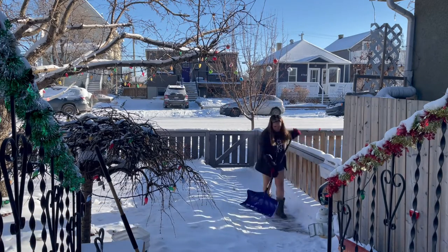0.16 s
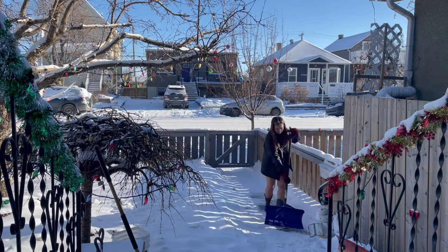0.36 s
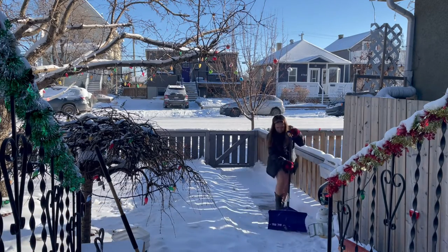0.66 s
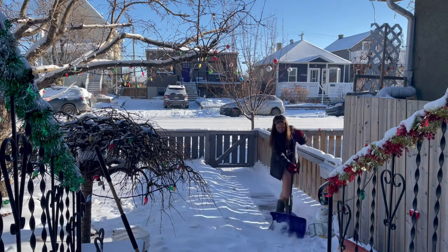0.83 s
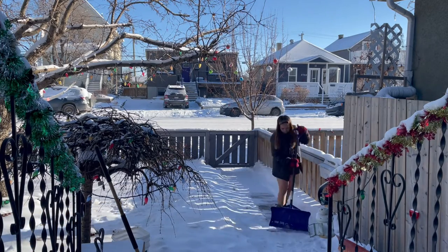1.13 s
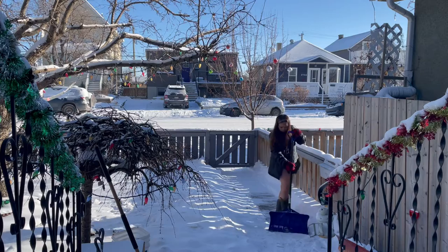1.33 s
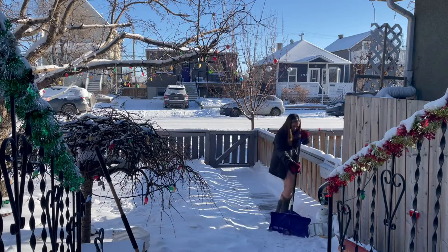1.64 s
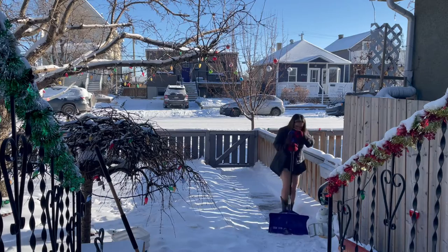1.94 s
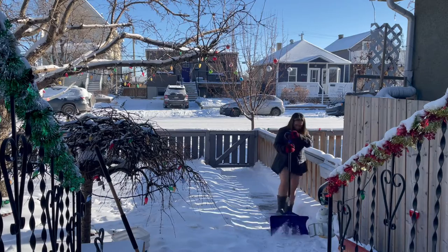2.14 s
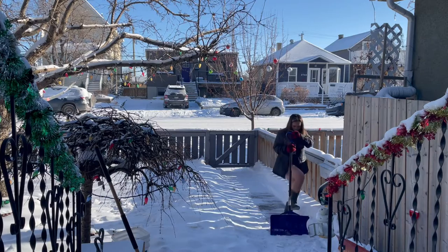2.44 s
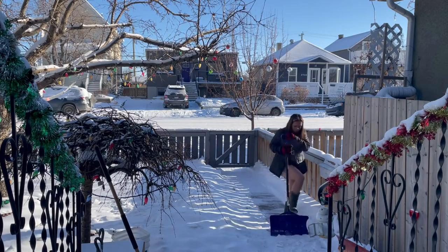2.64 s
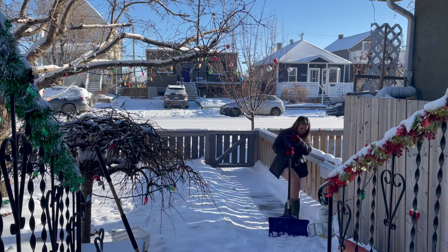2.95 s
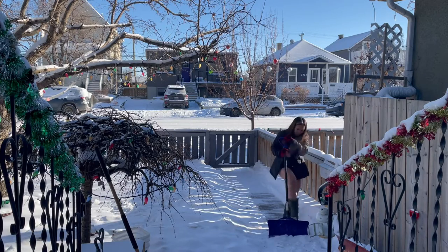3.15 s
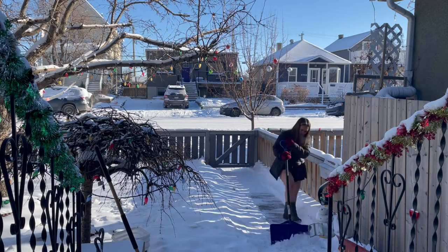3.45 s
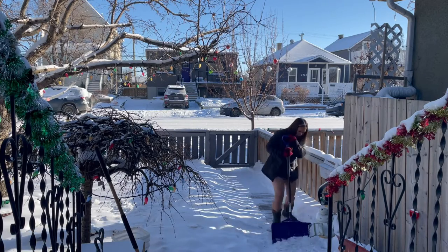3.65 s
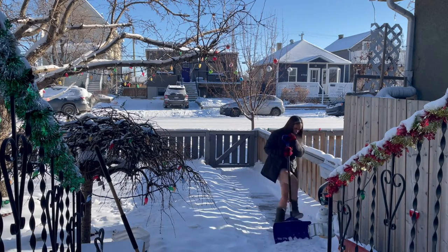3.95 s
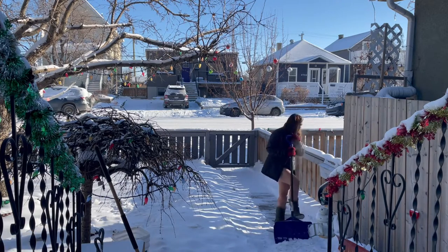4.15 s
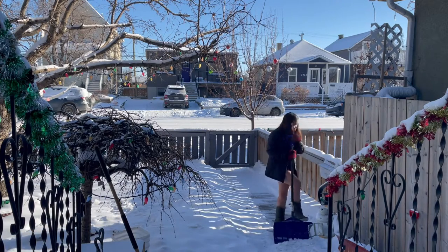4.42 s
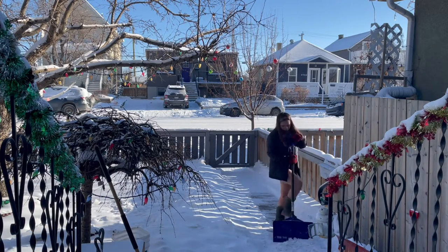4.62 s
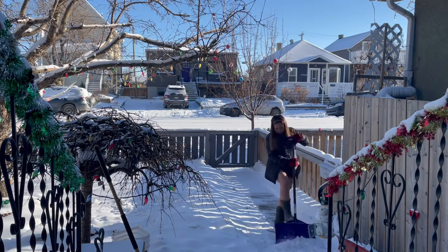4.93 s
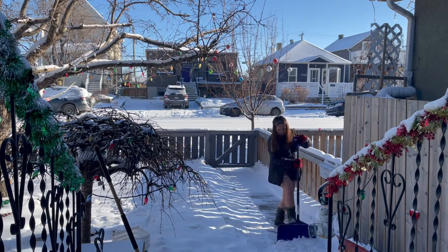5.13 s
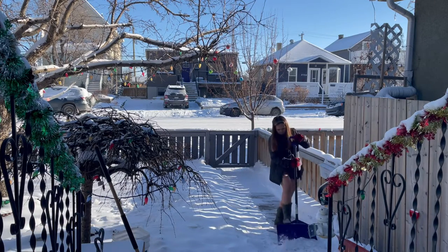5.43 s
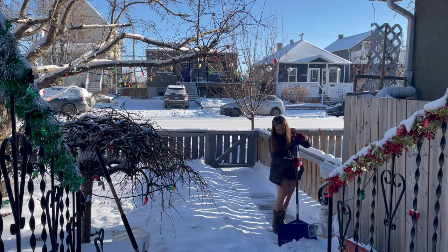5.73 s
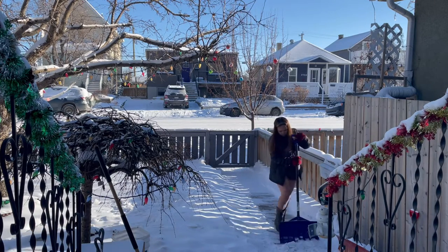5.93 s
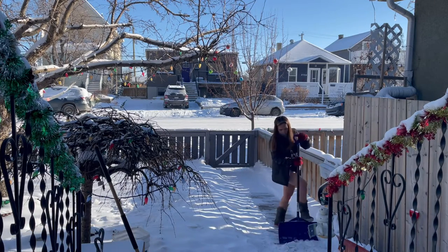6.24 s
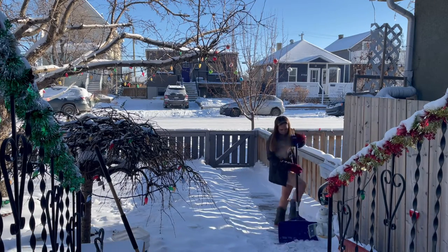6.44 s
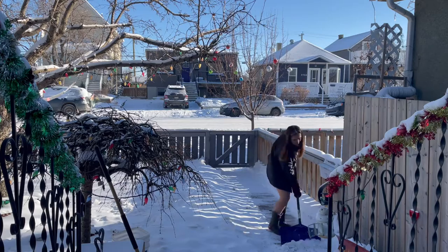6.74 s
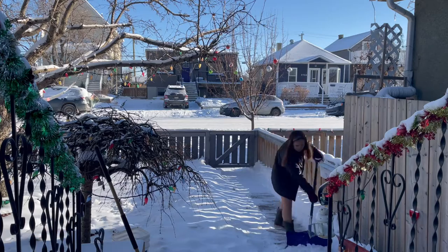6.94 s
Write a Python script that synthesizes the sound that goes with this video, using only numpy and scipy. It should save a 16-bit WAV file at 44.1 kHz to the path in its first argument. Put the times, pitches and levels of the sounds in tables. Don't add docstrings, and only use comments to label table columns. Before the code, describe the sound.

A phone on a porch hears a plastic shovel in crusty snow on a wooden deck, a few metres away outdoors. For the first 0.4 seconds there is only low distant traffic and a faint scrape. A crunch with a hollow knock comes at 0.46, a much harder one at 0.84, light scuffs near 1.2, then another strong chop at 1.53. Blows follow at 2.1, then crowd together from 2.5 to 3.45, with heavy gritty crunches and dull board thuds. A weaker stroke at 3.78 leads to a hard, deep one at 4.06. Small scrapes and a tiny squeak at 4.48 fill a lull. Chops resume at 4.89, 5.16, 5.4 and a knocky tap at 5.6. From 5.85 lighter bumps and pushes continue, a longer shove arrives at 6.76 and slides away by 7.1, while road noise grows slightly. Reflections are short and scattered.

```python
import sys
import numpy as np
from scipy import signal
from scipy.fft import rfft, irfft
from scipy.io import wavfile
from scipy.ndimage import uniform_filter1d

SR = 44100
rng = np.random.default_rng(int(sys.argv[2]) if len(sys.argv) > 2 else 0)


def put_to_file(sound):
    columns = np.atleast_2d(sound).T
    safe = np.clip(columns, -1, 1)
    whole_steps = np.round(safe * 32767)
    wavfile.write(sys.argv[1], SR, whole_steps.astype(np.int16))


def volts(x):
    e = np.asarray(x, float) / 20
    return 10 ** e


N = 312228
TOP_HZ = 15900

# freq_hz, level_db_per_hz
CRUST_SPECTRUM = [(290, 6), (500, -0.5), (888, -3), (1140, -2.5), (1430, -4.5), (2030, -2), (3160, -7.5),
                  (3900, -7.5), (7000, -23), (9100, -51), (15400, -120)]
# freq_hz, level_db_per_hz
POWDER_SPECTRUM = [(4500, -13), (6000, -9.5), (8300, -3.5), (11500, -11.5), (13500, -13.5), (15700, -17.5)]


def unit(x):
    return x / np.sqrt(np.mean(x ** 2))


def along(table, log=True):
    hz, value = np.transpose(table)
    bins = np.arange(N // 2 + 1) * SR / N + 1
    if log:
        return np.interp(np.log(bins), np.log(hz), value)
    return np.interp(bins, hz, value)


def over_time(curve):
    return np.interp(np.arange(N) / SR, *np.transpose(curve))


def colour(x, table):
    return irfft(rfft(x) * volts(along(table)), N)


def ring(x, modes, order=1):
    hz = np.arange(N // 2 + 1) * SR / N + 1
    gain = 0
    for k, (mode_hz, width_hz, db) in enumerate(modes):
        detune = (hz ** 2 - mode_hz ** 2) / (hz * width_hz)
        gain = gain + (-1) ** k * volts(db) / (1 + 1j * detune) ** order
    return unit(irfft(rfft(x) * gain, N))


def steady(x, hold_s):
    k = max(int(hold_s * SR), 8)
    power = uniform_filter1d(uniform_filter1d(x ** 2, k), k)
    return x / np.sqrt(power + 0.022)


def tones(x, modes, hold_s):
    return unit(sum(volts(db) * steady(ring(x, [(hz, width, 0)], order=2), hold_s) for hz, width, db in modes))


def walk(rate_hz):
    k = int(SR / rate_hz)
    held = np.repeat(rng.standard_normal(N // k + 1), k)
    return uniform_filter1d(uniform_filter1d(held, k), k)[:N]


def swells(events, extra_db, crest_db=3):
    power = np.zeros((len(extra_db), N))
    for (s, db, rise_ms, fall_ms), more_db in zip(events, np.transpose(extra_db)):
        a = max(int((s - rise_ms / 400) * SR), 0)
        b = min(int((s + fall_ms / 400) * SR), N)
        ms = 1000 * (np.arange(a, b) / SR - s)
        below_db = 20 * np.where(ms < 0, -ms / max(rise_ms, 1), ms / max(fall_ms, 1))
        rounded_db = np.hypot(below_db, np.where(ms < 0, 0.6, 1) * crest_db)
        power[:, a:b] += (volts(more_db)[:, None] * volts(db - rounded_db)) ** 2
    return np.sqrt(power)


def marked(s, times):
    nearest = np.argmin(np.abs(s[:, None] - np.array(times)), axis=0)
    return np.isin(np.arange(len(s)), nearest)


def traffic():
    # freq_hz, level_db_per_hz
    spectrum = [(30, -10), (135, 1), (230, -3), (500, -9.5), (900, -13), (1500, -21), (3000, -31),
                (6000, -71)]
    # time_s, level_db
    hum = [
        (.4, -49),
        (0.702, -52),
    ]
    # time_s, level_db
    road = [(.3, -57.5), (.62, -63.5), (2.3, -62.5), (2.94, -57), (4.2, -63.5), (5.35, -60), (6.6, -51.5),
            (7.08, -51)]
    mid, side = (colour(rng.standard_normal(N), spectrum) for _ in range(2))
    side = colour(side, [(50, -14.5), (250, -3.0), (800, 2.0), (8000, 1.0)])
    both = np.array([mid + side, mid - side])
    bass = signal.sosfilt(signal.butter(2, 300, fs=SR, output="sos"), both)
    bass_db = over_time(hum) + 0.91 * walk(6.8)
    road_db = over_time(road) + 7.0 + 1.83 * walk(3.774)
    return volts(bass_db) * unit(bass) + volts(road_db) * unit(both - bass)


def thuds():
    # peak_s, level_db, rise_ms_per_20db, fall_ms_per_20db, upper_over_lower_db
    knocks = [(.465, -25.5, 8, 18, -2), (.506, -28, 14, 58, 13), (0.834, -10.5, 18, 25, 16.5),
              (1.212, -25, 1, 14.5, 5), (1.23, -27.5, 6.5, 35.5, 9), (1.545, -17.5, 39, 9.5, 20),
              (1.588, -26.5, 12.5, 52, 19), (2.121, -28, 34, 31, 0), (2.519, -16.5, 33, 25.5, 1.5),
              (2.582, -22, 10.5, 37.5, 21), (2.715, -14, 12.5, 42, 10), (2.88, -18, 14, 27.5, 16.5),
              (3.007, -17, 47, 20, 6.5), (3.211, -21.5, 1, 34.5, 11.5), (3.351, -23, 41, 49, 5),
              (3.386, -21.5, 21, 23, 11.5), (3.402, -21.5, -5.5, 59.5, 1.5), (3.431, -17.5, 4, 12, 6),
              (3.782, -22.5, -1, 20, 11), (4.062, -19.5, 23, 26, 12), (4.89, -22, 22, 27, 5),
              (5.161, -27, 13, 23, 7), (5.403, -26.5, 17, 41, -3), (5.601, -19, -0.5, 23, -7.2)]
    # peak_s, level_db, fall_ms_per_20db, upper_over_lower_db
    bumps = [(0.033, -52.5, 18.5, -11), (.09, -48, 36, -6), (.752, -49.5, 31, 10), (1.425, -42.5, 17, 8),
             (2.81, -48, 39, 6), (5.215, -51, 40, -4), (5.261, -41, 23, 4), (5.302, -45, 20, 0),
             (5.76, -49.5, 20, 8), (5.8, -45.5, 28, 9), (5.93, -48, 25, 0), (6.098, -48.5, 44, -3),
             (0.684, -37, 102, 19), (.899, -36.5, 37.5, 20), (1.017, -43, 67, 18), (2.342, -36.5, 90, 15),
             (3.178, -38, 22, 14), (4.126, -40, 37, 11.5), (4.248, -44.5, 121, 6.5), (4.378, -35, 41, -5),
             (5.063, -32.5, 12, 7.5), (5.501, -50, 116, 7), (5.684, -39, 23, -3), (5.844, -32, 28, 7),
             (5.867, -30, 40, 15), (6.026, -37, 32, 18), (6.229, -30, 23.5, -4)]
    # peak_s, level_db, ms_per_20db, upper_over_lower_db
    leans = [(1.41, -48, 140, -5), (1.844, -40.5, 54, 8.5), (2.212, -38.5, 53, 20), (2.285, -36.5, 31, 11),
             (3.114, -42.5, 42, 2), (4.609, -40.5, 45, 1.5), (5.015, -44.5, 53, 7), (6.44, -38.5, 42, 8),
             (6.634, -33.5, 49, 9), (6.757, -30, 48, 18)]
    # time_s, level_db
    raps = [
        (0.825, -22.5),
        (1.839, -29),
        (6.228, -31),
    ]
    knock_rattle_db, bump_rise_ms = -6, 13
    rows = [(s, db + knock_rattle_db, *rest) for s, db, *rest in knocks]
    rows += [(s, db, bump_rise_ms, fall, upper) for s, db, fall, upper in bumps]
    rows += [(s, db, ms, ms, upper) for s, db, ms, upper in leans]
    rows += [(s, db, 5, 16, 4) for s, db in raps]
    return np.array(rows, float)


def deck():
    # freq_hz, width_hz, level_db
    low_boards = [(142.2, 26.7, -5.5), (189.6, 70, 1)]
    # freq_hz, width_hz, level_db
    high_boards = [(226.7, 78, 0.5), (327.4, 21.6, 3), (442.2, 14.6, -8)]
    # freq_hz, width_hz, level_db
    scoop_modes = [(658, 21, 7), (920, 600, -8)]
    scoop_hits_s = [1.017, 2.122, 2.212, 2.712, 3.211, 3.351, 3.385, 3.405, 4.381, 5.161, 6.028, 6.231,
                    6.441, 6.755]
    hit_db, idle_db = -2.5, -32.5
    rows = thuds()
    scoop_db = np.where(marked(rows[:, 0], scoop_hits_s), hit_db, idle_db)
    high_db = -10 * np.log10(1 + volts(-2 * rows[:, 4]))
    low_db = high_db - rows[:, 4]
    low, high, knock = swells(rows[:, :4], [low_db, high_db, scoop_db], crest_db=1.5)
    shove = rng.standard_normal(N)
    deep = tones(shove, low_boards, 0.042)
    hollow = tones(shove, high_boards, 0.005)
    scoop = steady(ring(shove, scoop_modes, order=2), 0.0029)
    return volts(6.0) * low * deep + high * hollow + volts(-11.0) * knock * scoop


def jolts():
    # peak_s, level_db, pitch_hz, width_ms_between_20db_down_points
    deep_jolts = [(0.8438, -22, 172, 53), (1.505, -21.5, 163, 11), (1.5266, -19.5, 162, 14),
                  (2.5185, -18, 165, 21.5), (2.582, -23.5, 190, 27), (2.7217, -19, 166, 19),
                  (2.7428, -24, 165, 9), (2.8804, -29.5, 187, 27), (2.983, -22, 147, 17),
                  (3.0065, -16.5, 164, 16.5), (3.211, -20.5, 194, 24), (3.3491, -33, 186, 29),
                  (3.3871, -29, 170, 19), (3.4112, -25, 178, 26), (3.4434, -29.5, 162, 20),
                  (4.0616, -12, 155.5, 20), (4.882, -29.5, 176, 26), (4.9098, -31, 147, 20),
                  (5.171, -23.5, 158, 30), (5.4028, -21.5, 166, 29), (5.6011, -24, 176, 14),
                  (6.2332, -21, 163, 18)]
    # peak_s, level_db, pitch_hz, width_ms_between_20db_down_points
    hollow_jolts = [(0.4642, -20.5, 327, 10), (0.5067, -23.5, 334, 10), (0.8315, -17, 330, 14),
                    (0.8477, -18.5, 363, 19), (0.8657, -24.5, 351, 24), (1.5065, -22, 290, 12),
                    (1.5398, -14.5, 344, 31), (2.1199, -19, 351, 31), (2.13, -29.5, 347, 8.3),
                    (2.5068, -31.5, 288, 19), (2.5202, -20, 333, 18), (2.5366, -22, 386, 9),
                    (2.5812, -27.5, 268, 18), (2.592, -27.5, 306, 14), (2.5978, -24, 306, 27),
                    (2.7032, -23.5, 320, 20), (2.7125, -22, 340, 6), (2.726, -11, 365, 8),
                    (2.7376, -26.5, 360, 31), (2.8773, -21.5, 320, 24), (2.8849, -21.5, 322, 25),
                    (2.9914, -15, 283, 13), (3.0015, -20, 323, 29), (3.0159, -11.5, 260, 15),
                    (3.025, -26.5, 276, 32), (3.2111, -12, 306, 9.3), (3.2196, -12, 340, 10.4),
                    (3.227, -22, 388, 16), (3.2416, -21, 316, 15), (3.3482, -27, 306, 17),
                    (3.412, -12.5, 342, 10), (3.4372, -24, 293, 30), (3.4471, -20, 352, 8.2),
                    (4.0583, -24.5, 309, 12), (4.0735, -31, 327, 46), (4.8871, -17, 303, 14),
                    (4.8955, -24, 289, 12), (4.9067, -24, 300, 28), (5.15, -26, 278, 19),
                    (5.1606, -32, 287.7, 32), (5.1709, -29.5, 287, 22), (5.416, -27, 310, 22),
                    (5.6104, -18.5, 266, 20), (5.8686, -25, 297, 13.4), (6.2335, -28.5, 298, 14)]
    rise, fall, jolt_db = 0.8, 0.95, -3
    rows = np.array([*deep_jolts, *hollow_jolts], float)
    out = np.zeros(N)
    t = np.arange(-2048, 4096) / SR
    for (s, db, hz, ms), turn in zip(rows, rng.random((len(rows), 1))):
        below_db = 20 * np.where(t < 0, -t / rise, t / fall) / max(ms / 1000, 0.002)
        a = int(s * SR) - 2048
        envelope = volts(db + jolt_db - below_db ** 2 / 6.5)
        out[a:a + len(t)] += envelope * np.cos(2 * np.pi * (hz * t + turn))
    return out


def bursts():
    # peak_s, level_db, ms_per_20db
    slabs = [(.4583, -18, -3), (0.8504, -24, 4.5), (1.5212, -27, 11), (1.5343, -18.5, 9.5), (2.507, -26, 9),
             (2.536, -44, 3.5), (2.715, -18, 9.5), (2.9966, -22.5, 14.5), (3.015, -32.5, 10.5),
             (3.2089, -21, 9.5), (3.3383, -32, 13), (3.7834, -32.5, 6), (4.0542, -25.5, 3),
             (4.883, -22.5, 10.5), (4.8958, -18, 12.5), (5.164, -26.5, 17.5), (5.4087, -20.5, 3),
             (5.8673, -36.5, 14)]
    events = [(s, db, 0.7 * ms, 1.25 * ms) for s, db, ms in slabs]
    force = swells(events, [np.zeros(len(events))], crest_db=2.5)[0]
    chips = rng.standard_normal(N)
    return force * unit(colour(chips, CRUST_SPECTRUM[2:]) + volts(-7.5) * colour(chips, POWDER_SPECTRUM))


def grains():
    grains_per_s, spread_db, top_db = 4000, 3.4, 11
    snap = rng.random(N) < grains_per_s / SR
    size_db = np.minimum(spread_db * rng.exponential(size=N), top_db)
    return unit(snap * volts(size_db) * rng.standard_normal(N)) + 0.78 * rng.standard_normal(N)


def bites():
    # peak_s, level_db, rise_ms_per_20db, fall_ms_per_20db, powder_db
    chops = [(0.46, -25, 14, 21.5, -8), (0.523, -30.5, 6.5, 28, -10), (.686, -33, 33, 24.5, -11.5),
             (0.832, -20.5, 18.5, 5, -8), (0.852, -17.5, 28, 13, -13.5), (1.518, -27.5, 24, 7, -9.5),
             (1.535, -20, 25.5, 13, -11.5), (2.117, -26, 22, 26, -8.5), (2.508, -21.5, 17.5, 31, -4),
             (2.58, -29, 6.5, 43, -7.5), (2.714, -21, 18.5, 56.5, -8), (2.997, -17.5, 23.5, 19, -9.5),
             (3.21, -21, 16.5, 44, -8.5), (3.341, -32.5, 28, 42, -18), (3.401, -28, 29, 81, -6.5),
             (3.439, -27, 40, 27, -6.5), (3.775, -35.5, 12.5, 53, -7), (4.058, -17.5, 16.5, 21.5, -6),
             (4.863, -32, 17.5, -1, -12), (4.89, -18, 15, 35.5, -7), (5.158, -23, 15, 28.5, -5.5),
             (5.403, -20, 12.5, 28.5, -13), (5.866, -33, 19, 39, -8), (6.762, -28, 42, 9, -32)]
    # peak_s, level_db, fall_ms_per_20db, powder_db
    catches = [(0.407, -48, 15, -30), (0.751, -41, 30, -14.5), (1.04, -37.5, 51, -8.5),
               (1.222, -41.5, 33, -1), (1.256, -40.5, 18, 1), (1.385, -45.5, 63, -0.5),
               (1.423, -40.5, 33, -6.5), (1.465, -37.5, 29, -7), (1.742, -49, 24, -13.5),
               (1.871, -45, 26, -4.5), (2.264, -43.5, 23, -4.5), (2.29, -37, 30, -6.5), (2.411, -50, 51, 1),
               (3.163, -42, 56, -6), (3.658, -41.5, 12, -15), (4.252, -38, 8, -9), (4.351, -49, 8, -2),
               (4.404, -45.5, 5, 3), (4.478, -49.5, 30, -4), (4.543, -56.5, 8, -2.5), (4.757, -58, 23, 3.5),
               (5.056, -39.5, 11, -18), (5.677, -41, 42, -3), (5.756, -47.5, 16, -8),
               (6.328, -49.5, 16, -6)]
    # peak_s, level_db, fall_ms_per_20db, powder_db
    pushes = [(0.026, -54, 164, -22), (.085, -51.5, 159, -13), (0.504, -36.5, 2, -4.5),
              (.574, -46.5, 26, -8), (.805, -48.5, 30, -1), (1.014, -37.5, 30, -4),
              (1.588, -41.5, 81, -1.5), (1.808, -39, 21, -5), (1.842, -44.5, 30, -6), (2.339, -43, 47, -9),
              (2.379, -46.5, 23, -8), (3.104, -43.5, 62, -6), (3.319, -38.5, 23, -6),
              (3.541, -44, 14, -8.5), (3.683, -47, 34, -11.5), (3.72, -59.5, 74, 10), (4.134, -41, 36, -4),
              (4.297, -45.5, 56, -1.5), (4.377, -33, 18.5, -1.1), (5.022, -47, 23, -1),
              (5.294, -48.5, 31, -8.5), (5.624, -38, 36.5, -5.5), (5.805, -43.5, 30, -8),
              (5.843, -39.5, 16, -4), (5.941, -59, 8, 13.5), (6.022, -37.5, 47, -6.5),
              (6.229, -45.5, 45, 1.2), (6.273, -39, 21, -3.5), (6.448, -42.5, 26, -7.5),
              (6.472, -44.5, 39, -13)]
    # peak_s, level_db, rise_ms_per_20db, fall_ms_per_20db
    slides = [(.359, -53, 21, 18), (.903, -36.5, 53, 46), (1.316, -46.5, 78, 50), (1.356, -43, 46, 14),
              (2.224, -43.5, 109, 21), (2.88, -40.5, 123, 45), (4.402, -44.5, 61, 64),
              (4.606, -48.5, 30, 131), (4.987, -47, 40, 85), (5.264, -42, 62, 11), (5.501, -41, 67, 27),
              (5.609, -42.5, 70, -2.5), (6.592, -43.5, 45, 115), (6.751, -39, 64, 190),
              (6.998, -51, 18, 143)]
    catch_rise_ms, push_rise_ms, slide_powder_db = 9.7, 23.8, -6
    rows = [*chops]
    rows += [(s, db, catch_rise_ms, fall, fine) for s, db, fall, fine in catches]
    rows += [(s, db, push_rise_ms, fall, fine) for s, db, fall, fine in pushes]
    rows += [(*row, slide_powder_db) for row in slides]
    return np.array(rows, float)


def shovel():
    # freq_hz, width_hz, level_db
    blade_modes = [(1131, 52, 23), (2220, 90, -30.5), (3700, 78, -16.5)]
    singing_s = [1.041, 1.256, 1.589, 2.264, 2.411, 2.58, 3.163, 3.683, 4.252, 4.377, 5.156, 5.263, 5.402,
                 5.623, 6.472]
    buried_s = [.458, .502, .903, 1.015, 1.464, 1.805, 2.339, 3.341, 3.4, 3.439, 4.295, 5.503, 5.676, 5.843,
                5.867, 6.749]
    # time_s, level_db
    drag_curve = [(.3, -81), (.62, -67), (1.17, -72.5), (1.35, -70), (1.7, -71), (1.94, -85), (2.45, -58),
                  (2.94, -67), (3.07, -66), (3.92, -75), (4.2, -72.5), (4.55, -72), (4.77, -78), (5.1, -87),
                  (5.97, -64), (6.16, -77), (6.33, -63.5), (6.68, -70)]
    # peak_s, level_db, rise_ms_per_20db, fall_ms_per_20db
    squeaks = [
        (4.468, -51, 10, 12),
        (4.481, -42, 12, 20),
    ]
    # freq_hz, width_hz, level_db
    squeak_modes = [(2150, 200, 1), (3410, 160, -3)]
    # time_s, peak_db
    ticks = [(0.4498, -22), (2.072, -42), (3.3375, -28), (4.0527, -13.5), (4.8822, -20), (5.338, -45),
             (5.585, -42), (0.4993, -17), (0.7482, -32.5), (1.502, -24), (1.589, -22), (2.0976, -20),
             (4.858, -28), (5.1402, -20), (5.501, -23.5), (5.3887, -22.5), (5.5997, -11.5)]
    singing_db, buried_db, usual_db = 0.5, -36, -8.5
    rows = bites()
    s, powder_db = rows[:, 0], rows[:, 4]
    blade_db = np.select([marked(s, singing_s), marked(s, buried_s)], [singing_db, buried_db], usual_db)
    crust, powder, blade = swells(rows[:, :4], [0 * s, powder_db, blade_db], crest_db=1.5)
    drag = volts(over_time(drag_curve) + 7.2 * walk(25))
    snaps = grains()
    crushed = colour(snaps, CRUST_SPECTRUM)
    dust = colour(snaps, POWDER_SPECTRUM)
    coarse = np.hypot(volts(-3.0) * crust, volts(1.5) * drag) * unit(crushed)
    fine = np.hypot(volts(1.5) * powder, drag) * unit(dust)
    squeak = swells(squeaks, [[0, 0]])[0] * ring(snaps, squeak_modes, order=2)
    touches = [(s, db, 1.5, 16) for s, db in ticks]
    contact = swells(touches, [np.full(len(touches), -11.0)], crest_db=3.0)[0]
    tick = contact * unit(crushed + volts(-10.5) * dust)
    return coarse + fine + volts(-6.0) * blade * ring(snaps, blade_modes) + squeak + tick


def echoes(x, t60_s, delay_s, size):
    count = N // size + 1
    starts = np.arange(count + 1)[:, None] * size
    blocks = np.pad(x, (size, 3 * size))[starts + np.arange(2 * size)]
    t = np.arange(2 * size) / SR - delay_s
    tails = rng.standard_normal((2, count + 1, 2 * size)) * volts(-60 * t / t60_s) * (t > 0)
    tails /= np.sqrt(np.sum(tails ** 2, axis=2, keepdims=True))
    window = np.sqrt(np.hanning(2 * size))
    wet = signal.fftconvolve((blocks * window)[None], tails, axes=2)
    out = np.zeros((2, (count + 5) * size))
    for k in range(count + 1):
        out[:, k * size:k * size + wet.shape[2]] += wet[:, k]
    return out[:, size:size + N]


def scene():
    # freq_hz, phase_rad
    port_phase = [(400, 0), (860, -.9), (2240, -.6), (5000, .3), (8300, -3.14), (11700, -6.28),
                  (14900, -9.42), (16000, -11)]
    # freq_hz, left_minus_right_db
    port_balance = [(110, 0), (250, -5.5), (700, -0.5), (1290, -7.5), (2380, 6.5), (4400, 8), (8120, 0.5)]
    # freq_hz, level_db
    scatter = [(100, -7), (400, -9), (700, 0), (5000, 1), (8000, -3)]
    porch_t60_s, yard_t60_s, yard_db = 0.016, 0.13, -23.5
    near = shovel() + deck() + jolts() + bursts()
    skew = volts(along(port_balance) / 2) * np.exp(0.5j * along(port_phase, log=False))
    direct = irfft(rfft(near) * np.array([skew, 1 / skew]), N)
    scattered = colour(near, scatter)
    porch = echoes(scattered, porch_t60_s, 0.0008, size=1024)
    yard = volts(yard_db) * echoes(scattered, yard_t60_s, 0.027, size=8192)
    heard = colour(direct + porch + yard, [(45, -17), (105, 0)])
    return heard + traffic()


def mask(x, size=2048):
    # freq_hz, db_under_other_channel
    mask_db = [(7300, -11), (7900, -6), (9000, -7), (9800, -11), (12500, -7), (14000, 0), (15000, 1),
               (15600, -2.5)]
    width, overlap = 32, size * 3 // 4
    mid_side = np.array([x[0] + x[1], x[0] - x[1]]) / 2
    hz, _, z = signal.stft(mid_side, SR, nperseg=size, noverlap=overlap)
    frames = z.shape[2]
    power = np.abs(z[:, :-1]) ** 2
    power = uniform_filter1d(power.reshape(2, -1, width, frames).mean(axis=2), 3, axis=2)
    limit_db = np.interp(hz[width // 2::width], *np.transpose(mask_db), left=-99)
    frame_db = 10 * np.log10(power[:, 8:].sum(axis=(0, 1)) + 1e-12)
    attack_db = np.clip(3 * np.gradient(frame_db), 0, 12)
    spare_db = attack_db + 3.5 * np.repeat(rng.standard_normal(frames), 3)[:frames]
    keep = power > volts(2 * (limit_db[:, None] - spare_db)) * power[::-1]
    z[:, :-1] *= np.repeat(keep, width, axis=1)
    mid, side = signal.istft(z, SR, nperseg=size, noverlap=overlap)[1][:, :N]
    return np.array([mid + side, mid - side])


def low_pass(x):
    return signal.sosfilt(signal.butter(12, 16440, fs=SR, output="sos"), x)


def record(dry):
    rounded = np.tanh(1.5 * dry) / 1.5
    cut = signal.sosfilt(signal.ellip(10, 0.2, 80, TOP_HZ, fs=SR, output="sos"), rounded)
    mix = colour(mask(cut), [(TOP_HZ, 0), (TOP_HZ + 60, -200)])
    return low_pass(mix)


dry = scene()
out = record(dry)
put_to_file(out)
```